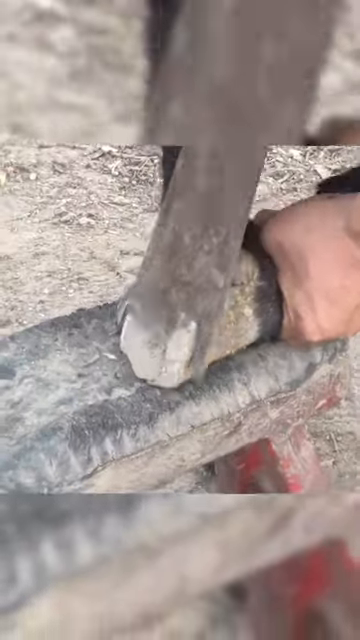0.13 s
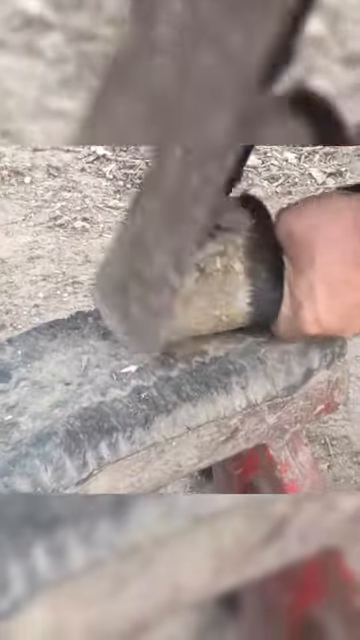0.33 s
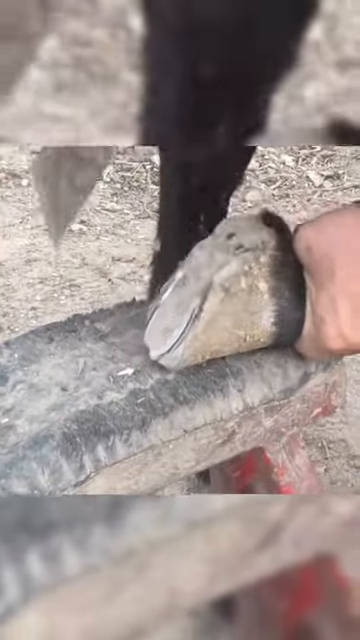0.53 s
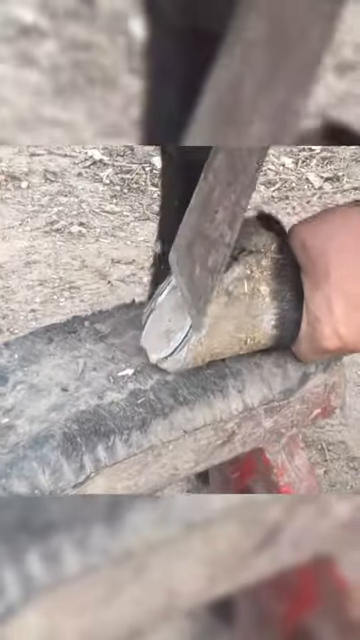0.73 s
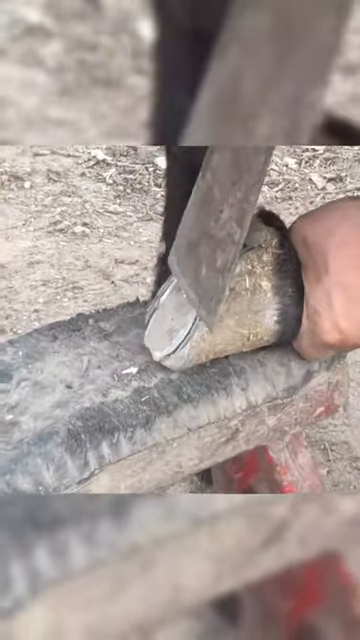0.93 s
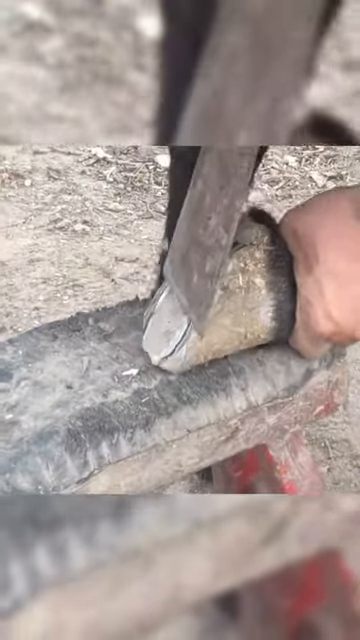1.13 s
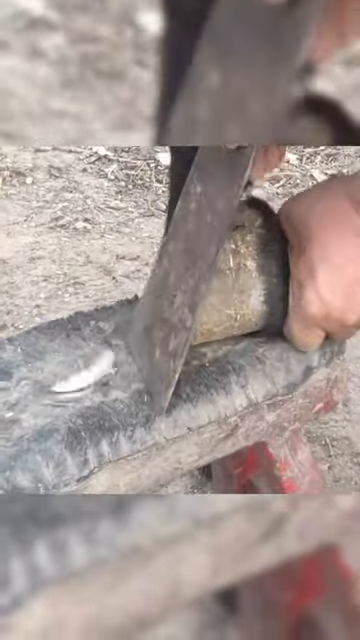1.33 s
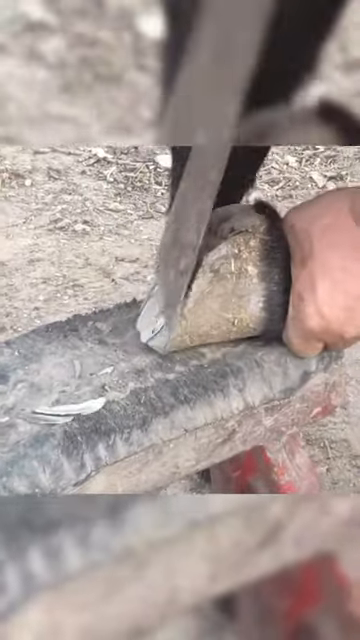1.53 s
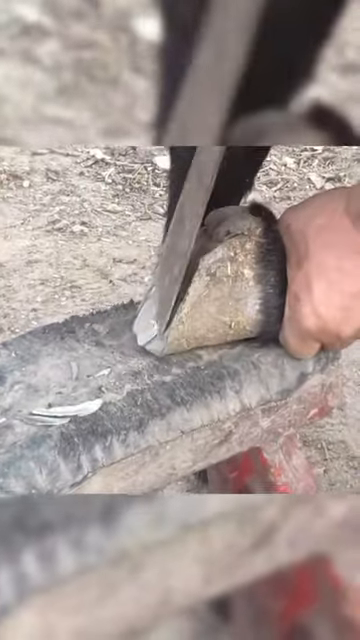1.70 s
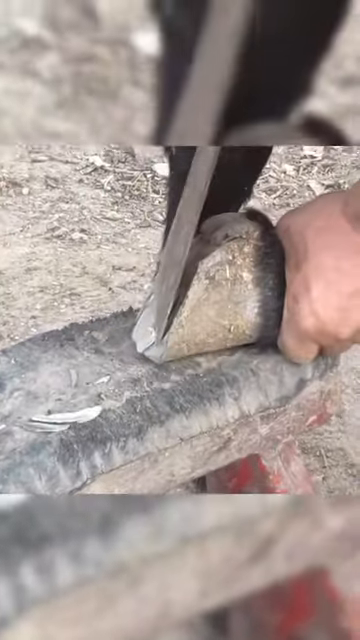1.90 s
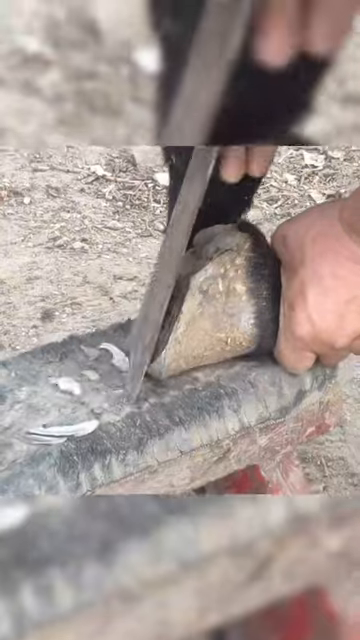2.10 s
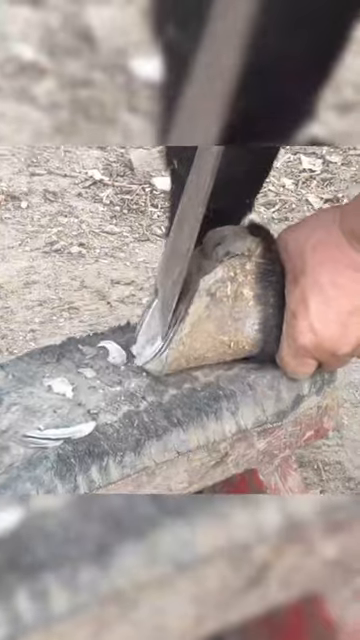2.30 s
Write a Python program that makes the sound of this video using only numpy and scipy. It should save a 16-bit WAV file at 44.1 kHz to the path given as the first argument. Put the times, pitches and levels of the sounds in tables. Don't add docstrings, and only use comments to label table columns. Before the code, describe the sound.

Close and dry outdoors: a crackling slice through hoof horn with a woody knock and low thud, a soft metallic tap, then two shorter crunches, over faint hiss stronger on the left side.

```python
import sys
import numpy as np
from scipy import signal
from scipy.fft import rfft, irfft
from scipy.io import wavfile
from scipy.ndimage import uniform_filter1d

SR = 44100
rng = np.random.default_rng(int(sys.argv[2]) if len(sys.argv) > 2 else 0)


def linear_from_db(decibels):
    return 10 ** (np.asarray(decibels, float) / 20)


def log_audio(samples):
    frames = np.atleast_2d(samples).T
    limited = np.clip(frames, -1, 1)
    pcm = np.round(limited * 32767).astype(np.int16)
    wavfile.write(sys.argv[1], SR, pcm)


N = 103635
T = np.arange(N) / SR
PAN_DB = 4.5
SIDES = np.array([[.5], [-.5]])


def crunch():
    # start in seconds, break-out in seconds, level at start in dB, level at break-out in dB.
    strokes = [
        (0.144, 0.218, -48.5, -41.5),
        (1.25, 1.294, -50.5, -47.5),
        (2.038, 2.063, -43, -46.5),
    ]
    # frequency in Hz, level in dB.
    horn = [(290, -50), (500, -22), (815, -9), (1670, -7), (2290, -3), (3680, -7.5), (5670, -3.5),
            (6640, -3), (15500, -11)]
    bite_s, let_go_t60_s = .012, 0.063
    debris_db, debris_t60_s = -11.5, 0.46
    crumbs_per_s, crumb_spread_db = 9000, 1.5

    force = 0
    for start, end, start_db, end_db in strokes:
        share = np.clip((T - start) / (end - start), 0, 1)
        push = linear_from_db(start_db + (end_db - start_db) * share ** 2)
        bite = 1 / (1 + np.exp(np.clip((start - T) / bite_s * 2, -50, 50)))
        release = decay(end, let_go_t60_s) + linear_from_db(debris_db) * decay(end, debris_t60_s)
        force = force + push * bite * release

    happens = rng.random(N) < crumbs_per_s / SR
    sizes = linear_from_db(crumb_spread_db * np.minimum(rng.exponential(1, N), 5)) * happens
    crumbs = rms_one(sizes) * half_shared() * linear_from_db(1 * drift(63))
    hz, db = np.transpose(horn)
    bins_hz = np.arange(N // 2 + 1) * SR / N
    colour = linear_from_db(np.interp(np.log(bins_hz + 1), np.log(hz), db, left=-60))
    return force * rms_one(irfft(rfft(crumbs) * colour, N))


def break_out():
    # time in seconds, peak in dB, frequency in Hz, t60 in seconds.
    knocks = [(.0675, -44.5, 1560, 0.0062), (.204, -44, 1120, 0.0084), (.2141, -16, 1073, 0.0074),
              (0.2178, -19, 1240, 0.012), (.2197, -23, 1650, 0.0046), (.2222, -18.5, 1060, 0.004),
              (1.2955, -21, 890, 0.0133), (1.2992, -29, 790, 0.013), (1.3001, -53, 1780, 0.0093),
              (1.3030, -32, 1135, 0.031), (1.3092, -36, 780, 0.023), (2.0578, -29, 784, 0.028),
              (2.0618, -18, 1800, 0.014), (2.0635, -22.5, 980, 0.0025), (2.0642, -46, 1900, 0.0061),
              (2.0664, -23, 686, 0.0053), (2.079, -32, 1440, 0.0054), (.284, -47, 810, .015),
              (.296, -44.5, 1090, .012), (.303, -42.5, 720, 0.01)]
    # time in seconds, peak in dB, frequency in Hz.
    squeaks = [(0.16, -41, 5690), (0.172, -47, 1900), (.204, -40, 5000), (0.215, -39.5, 5900),
               (1.272, -46.5, 5700), (1.28, -40.5, 2630), (1.285, -37.5, 2813), (1.285, -45, 5480),
               (1.291, -45, 2885), (2.029, -47, 2720), (2.0295, -53, 2100), (2.057, -38, 2920),
               (2.063, -39, 2680), (1.943, -41, 3400), (1.948, -50, 3020), (1.958, -43, 2910),
               (1.716, -61, 3500), (1.753, -55, 3240), (.757, -55, 4600), (2.055, -39.5, 5700),
               (2.061, -49, 5900)]
    # time in seconds, level in dB.
    cracks = [
        (0.2185, -34),
        (1.296, -37.5),
        (2.058, -33.5),
    ]

    knocking = -sum(ring(click(s, linear_from_db(db)), hz, t60) for s, db, hz, t60 in knocks)
    knocking = band(knocking, 560, 2600)
    splinters = rms_one(band(rng.standard_normal(N), 640, 2200))
    cracking = sum(linear_from_db(db) * dying(s, 0.077) for s, db in cracks) * splinters
    squeaking = sum(swell(s, db, hz, 0.015) for s, db, hz in squeaks)
    return knocking + cracking + squeaking


def trestle():
    # time in seconds, cushion level in dB, beam level in dB, frame level in dB.
    thumps = [
        (0.2193, -23.5, -30, -47.5),
        (1.2953, -38.5, -60, -42),
        (1.3, -73, -36, -52),
        (1.302, -30.5, -56, -63),
        (2.029, -61, -50.5, -76),
        (2.0622, -57, -31, -41),
        (2.064, -26, -72, -74),
    ]
    # frequency in Hz, t60 in seconds.
    supports = [(260.2, 0.02), (127.9, 0.28), (103.9, 0.53)]
    shudder_db, shudder_t60_s = -11, 0.33
    settle_db, settle_t60_s = -26, 0.56
    ring_stops_s, stop_edge_s = 0.18, 0.007

    shudder = rms_one(band(rng.standard_normal(N), 45.3, 257))
    settling = rms_one(band(half_shared(), 470, 3240))
    (pad_hz, pad_t60), *wood = supports
    out = 0
    for s, pad_db, *wood_db in thumps:
        out = out + swell(s, pad_db, pad_hz, pad_t60)
        free = 1 / (1 + np.exp(np.clip((T - s - ring_stops_s) / stop_edge_s, -50, 50)))
        for (hz, t60), db in zip(wood, wood_db):
            blow = ring(click(s + 0.0072, linear_from_db(db)), hz, t60)
            blow = signal.lfilter([.02], [1, -.98], blow)
            out = out + free * linear_from_db(2 * drift(27.0)) * blow
        out = out + linear_from_db(wood_db[0] + shudder_db) * dying(s, shudder_t60_s, 0.0099) * shudder * free
        out = out + linear_from_db(pad_db + settle_db) * dying(s, settle_t60_s) * settling * free
    return out


def taps():
    # time in seconds, level in dB, contact length in seconds, tilt in dB per octave, skid level in dB.
    touches = [
        (0.483, -68, 0.0049, 17, -67.5),
        (0.573, -86.5, 0.0072, 25, -78),
        (0.753, -40.5, 0.02, -8.5, -73),
        (2.216, -75, 0.011, 15.5, -58),
        (2.267, -62.5, 0.013, 23.5, -57),
    ]
    # frequency in Hz, level in dB, t60 in seconds.
    blade = [(664, -17.5, 0.17), (750, -11, 0.033), (1320, -13, 0.02), (1640, 0.5, 0.068),
             (2060, 0.5, 0.017), (2443, 1, 0.1), (2870, 2, 0.073), (3440, 9.5, 0.069), (4500, -3, 0.059),
             (5900, -8.5, 0.038), (6880, -16, 0.053), (9600, -32.5, 0.11), (10930, -28, 0.036),
             (12700, -46, 0.051)]
    modes_db, grit_db = -4, 21
    skid_t60_s, touch_rise_s = 0.28, 0.0093

    skid = patchy(rms_one(band(half_shared(), 1800, 11000, order=1)))
    out = 0
    for s, db, length, tilt_db, skid_db in touches:
        grit = rng.standard_normal(N) * dying(s, 3 * length, touch_rise_s)
        grit /= np.sqrt(np.sum(grit ** 2))
        modes = 0
        for hz, mode_db, t60 in blade:
            mode = ring(grit, hz, t60)
            tilted_db = mode_db + tilt_db * np.log2(hz / 2500)
            modes = modes + linear_from_db(tilted_db + modes_db) * mode / np.abs(mode).max()
        centre_hz = 3000 * linear_from_db(tilt_db)
        rasp = linear_from_db(grit_db + max(tilt_db, 0)) * band(grit, centre_hz / 3, centre_hz * 2, order=1)
        out = out + linear_from_db(db) * band(modes + rasp, 837, 14800, order=3)
        bright_skid = rms_one(skid + 0.33 * tilt_db * np.gradient(skid, axis=1))
        out = out + linear_from_db(skid_db) * dying(s, skid_t60_s) * bright_skid
    return out


def rustles():
    # start in seconds, length in seconds, level in dB, centre at start in Hz, centre at end in Hz.
    drags = [(0.629, 0.09, -65, 3200, 2870), (0.773, 0.076, -67, 796, 658), (1.007, 0.22, -65, 3010, 2940),
             (1.041, 0.22, -73.5, 5270, 5250), (1.456, 0.062, -65.5, 4730, 5040),
             (1.713, 0.063, -60.5, 4030, 5410), (1.73, 0.095, -61, 2600, 2710),
             (1.748, 0.019, -64, 3373, 3110), (1.922, 0.045, -57, 3500, 2905),
             (1.955, 0.064, -61.5, 2900, 2610), (0.786, .1, -69.5, 1276, 1225),
             (1.943, 0.027, -67.5, 3470, 2023), (2.191, 0.17, -66, 2905, 2940)]
    q, rise, air_db = 5.6, 0.15, -7

    air = rms_one(band(half_shared(), 2300, 7000, order=6))
    out = 0
    for s, length, db, start_hz, end_hz in drags:
        share = np.clip((T - s) / length, 0, 4)
        shape = np.minimum(share / rise, 1) * np.exp(-2.5 * np.maximum(share - rise, 0) ** 2)
        centre_hz = start_hz * (end_hz / start_hz) ** np.minimum(share, 1)
        phase = 2 * np.pi * np.cumsum(centre_hz) / SR
        low_pass = signal.butter(2, start_hz / q / 2, fs=SR)
        in_phase = rms_one(signal.lfilter(*low_pass, half_shared()))
        quadrature = rms_one(signal.lfilter(*low_pass, half_shared()))
        gliding = in_phase * np.cos(phase) + quadrature * np.sin(phase)
        out = out + linear_from_db(db + 2 * drift(58)) * shape * (gliding + linear_from_db(air_db) * air)
    return out


def sings():
    # start in seconds, length in seconds, level in dB, frequency in Hz, left over right in dB.
    lines = [(0.043, 0.1, -81.5, 358, 15.5), (0.133, .03, -67.5, 2390, -4),
             (0.151, 0.013, -55.5, 2310, -13), (0.198, 0.0088, -53.5, 2300, -17),
             (0.385, 0.0935, -75.5, 947, 27.5), (0.773, .1, -97, 9200, 6), (0.773, .12, -98.5, 10630, 4),
             (0, 0.093, -97, 8080, 6), (0.254, 0.091, -81, 8300, 0), (0, 0.029, -72, 638, 5),
             (1.022, .2, -77.5, 5365, 13), (1.426, 0.15, -93.5, 10620, -17),
             (1.445, 0.16, -70.5, 2826, 12.5), (1.745, 0.028, -76, 5160, 19), (1.929, 0.027, -58, 3714, 12),
             (1.965, 0.047, -63.5, 2134, 20), (1.961, 0.021, -59.5, 2380, 13),
             (2.019, 0.021, -69, 1070, 17)]
    edge_s, width_hz = 0.0035, 60
    out = 0
    for s, length, db, hz, pan_db in lines:
        on = np.clip(np.minimum(T - s, s + length - T) / edge_s + 1, 0, 1)
        line = rms_one(band(rng.standard_normal(N), hz - width_hz / 2, hz + width_hz / 2, order=2))
        out = out + linear_from_db(db + pan_db * SIDES) * on * line
    return out


def port_hiss():
    # time in seconds, level in dB.
    lower_level = [(0, -66.5), (.27, -64.5), (.45, -67), (.95, -69), (1.1, -64), (1.25, -66.5),
                   (1.4, -72.5), (1.55, -70.5), (1.68, -70.5), (1.8, -69), (1.95, -66.5), (2.12, -64.5),
                   (2.35, -71)]
    upper_level = [(0.0, -70.5), (0.16, -69.5), (0.45, -74.5), (0.7, -81), (0.85, -74), (1.08, -89),
                   (1.21, -71), (1.39, -74.5), (1.54, -72), (1.8, -86), (2.03, -69.5), (2.17, -78),
                   (2.35, -76)]
    # centre in Hz, width in Hz, level in dB.
    lower_humps = [(1830, 530, -0.5), (1898, 540, 1.5), (2390, 110, -6)]
    upper_humps = [(3200, 400, -34.5), (3785, 91, -1.5), (4600, 200, -4.5), (5700, 380, 5.5),
                   (6840, 930, 17.5)]
    lower = 2 * linear_from_db(curve(lower_level)) * humped(lower_humps)
    upper = 2 * linear_from_db(curve(upper_level)) * humped(upper_humps)
    return walled(lower + upper)


def background():
    # time in seconds, level in dB.
    drone_level = [(0, -74.5), (.15, -73.5), (.4, -74), (.65, -72.5), (.72, -79), (1.05, -82.5),
                   (1.25, -65.5), (1.45, -78.5), (1.85, -73), (1.95, -81.5), (2.35, -81)]
    whine_level = [(0, -99), (.3, -106), (.85, -91), (.96, -100), (1.2, -88), (1.58, -91), (1.68, -110),
                   (2.18, -110), (2.22, -112), (2.35, -103)]
    drone_hz, drone_width_hz, whine_hz = 813, 179, 15480

    hiss = port_hiss()
    drone = band(rng.standard_normal(N), drone_hz - drone_width_hz / 2, drone_hz + drone_width_hz / 2, order=3)
    drone = 2 * linear_from_db(curve(drone_level) + 0.5 * drift(39)) * rms_one(drone)
    rumble = rms_one(band(ring(rng.standard_normal(N), 48, 0.016), 22, 300))
    rumble = linear_from_db(-74 + 3.1 * drift(1.3)) * rumble
    air = linear_from_db(-82.5) * rms_one(band(half_shared(), 100, 408, order=1))
    air = air + linear_from_db(-105) * rng.standard_normal((2, N))
    whine = linear_from_db(curve(whine_level)) * rms_one(band(half_shared(), whine_hz - 40, whine_hz + 40))
    noises = patchy(hiss * linear_from_db(np.array([[0], [-28]])) + air + whine)
    return noises + drone * linear_from_db(np.array([[0], [-20]])) + rumble * linear_from_db(PAN_DB * SIDES)


def rms_one(x):
    return x / np.sqrt(np.mean(x ** 2) + 1e-20)


def curve(rows):
    return np.interp(T, *np.transpose(rows))


def drift(rate):
    r = np.exp(-2 * np.pi * rate / SR)
    return rms_one(signal.lfilter([1], [1, -2 * r, r * r], rng.standard_normal(N + SR))[SR:])


def band(x, low_hz, high_hz, order=2):
    sos = signal.butter(order, [low_hz, min(high_hz, SR / 2.2)], "band", fs=SR, output="sos")
    return signal.sosfilt(sos, x + 1e-18)


def ring(x, hz, t60):
    r, w = linear_from_db(-60 / (t60 * SR)), 2 * np.pi * hz / SR
    return signal.lfilter([0, np.sin(w)], [1, -2 * r * np.cos(w), r * r], x + 1e-18)


def decay(s, t60):
    return np.exp(-np.maximum(T - s, 0) * np.log(1000) / t60)


def dying(s, t60, rise_s=0.0005):
    return (1 - np.exp(-np.maximum(T - s, 0) / rise_s)) * decay(s, t60)


def click(s, height):
    return height * (np.arange(N) == int(s * SR))


def swell(s, db, hz, t60):
    x = np.zeros(N)
    start = int(s * SR)
    grain = ring(ring(signal.unit_impulse(SR // 10), hz, t60), hz, t60)
    x[start:start + SR // 10] = linear_from_db(db) * grain / np.abs(grain).max()
    return x


def half_shared():
    white, diffuse = rng.standard_normal((3, N)), 0.62
    return np.sqrt(1 - diffuse) * white[0] + np.sqrt(diffuse) * white[1:]


def patchy(x):
    z = signal.stft(x, nperseg=512)[2]
    field = uniform_filter1d(rng.standard_normal(z.shape), size=2, axis=-2)
    field = uniform_filter1d(field, size=22, axis=-1)
    return signal.istft(z * linear_from_db(4.5 * rms_one(field)), nperseg=512)[1][..., :N]


def humped(humps):
    out = 0
    for hz, width, db in humps:
        flicker_db = 1.2 * (drift(5) + 1.1 * drift(33))
        hump = rms_one(band(rng.standard_normal(N), hz - width / 2, hz + width / 2, order=1))
        out = out + linear_from_db(db + flicker_db) * hump
    return rms_one(band(out, 1354, 6040, order=5))


def walled(x):
    return signal.sosfilt(signal.cheby2(8, 40, 6900 * 1.08, fs=SR, output="sos"), x)


def port(x, peaks, lag_s):
    for hz, q, db in peaks:
        g, w = linear_from_db(db / 2), 2 * np.pi * hz / SR
        a = np.sin(w) / (2 * q)
        x = signal.lfilter([1 + a * g, -2 * np.cos(w), 1 - a * g], [1 + a / g, -2 * np.cos(w), 1 - a / g], x)
    return np.interp(T - lag_s, T, x)


def scene():
    # frequency in Hz, Q as a ratio, gain in dB.
    left_port = [(1090, 2.08, 4), (1900, 5.8, 1.5), (5850, 3.05, 11), (12540, 0.48, -17)]
    right_port = [(2530, 15, -2), (4220, 4.3, 0), (8260, 0.24, -7.5)]
    near = patchy(crunch()) * linear_from_db(-2 * SIDES) + break_out() + trestle() + taps()
    left, right = near + patchy(walled(rustles())) * linear_from_db(5 * SIDES)
    left = linear_from_db(PAN_DB / 2) * port(left, left_port, 0)
    right = linear_from_db(-PAN_DB / 2) * port(right, right_port, 0.00011)
    low_cut = signal.butter(2, 71, "high", fs=SR)
    return signal.lfilter(*low_cut, np.array([left, right])) + background() + sings()


def roll_off(x):
    return signal.sosfilt(signal.butter(12, 15680, fs=SR, output="sos"), x)


def record(dry):
    low_pass = signal.ellip(10, .5, 70, 15650, fs=SR, output="sos")
    mix = signal.sosfilt(low_pass, dry)
    return roll_off(mix)


dry = scene()
out = record(dry)
log_audio(out)
```